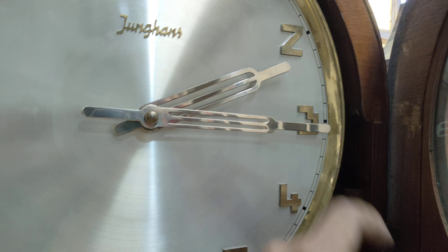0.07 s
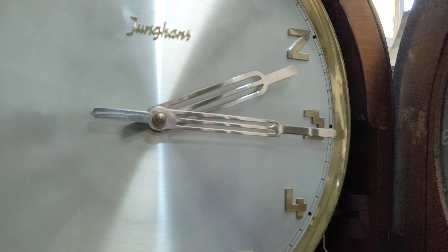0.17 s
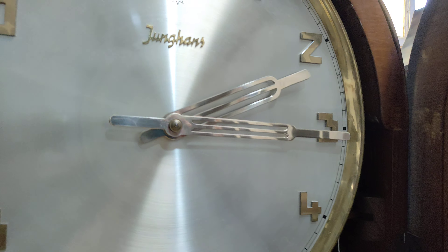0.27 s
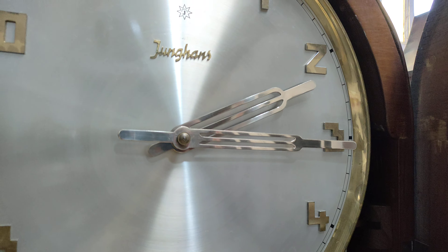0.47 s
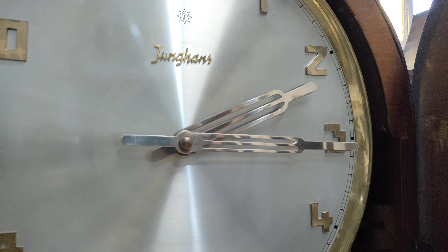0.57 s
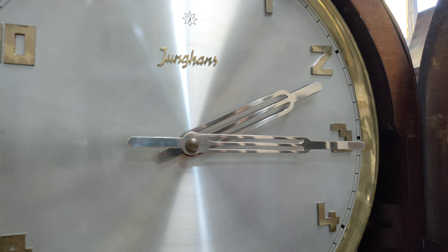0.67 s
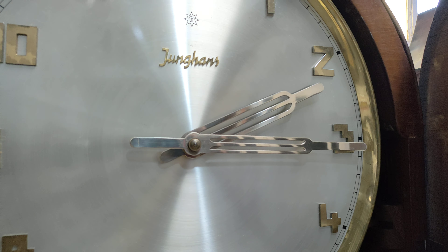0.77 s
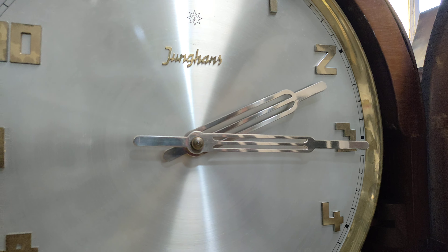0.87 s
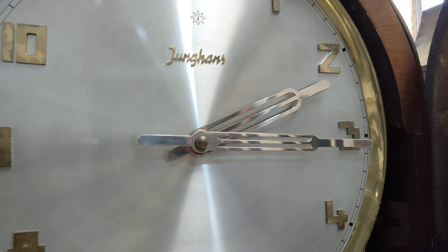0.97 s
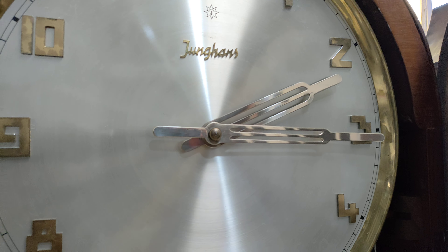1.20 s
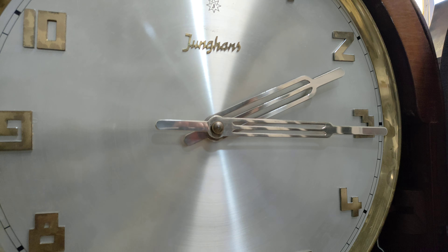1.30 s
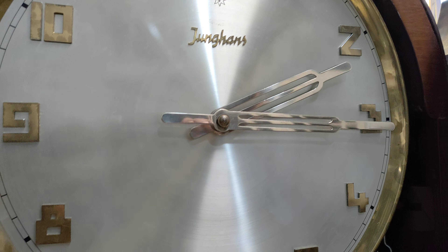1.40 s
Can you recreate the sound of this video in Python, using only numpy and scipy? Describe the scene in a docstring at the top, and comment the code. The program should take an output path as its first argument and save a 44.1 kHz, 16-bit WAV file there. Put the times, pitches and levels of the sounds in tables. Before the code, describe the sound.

A ringing metallic clink from a wall clock mechanism, after a light rattle.

```python
"""Wall clock in a hard room

The mechanism clinks after its minute hand has been pushed round, heard on a stereo pair of microphones.
Metal parts chatter lightly, then drop with a louder clink whose overtones ring out in the room.
The wooden case bumps softly and the levers tick; a low hum and a faint hiss lie underneath."""
import sys
import numpy as np
from scipy import signal
from scipy.fft import rfft, irfft
from scipy.io import wavfile

SR = 44100
rng = np.random.default_rng(int(sys.argv[2]) if len(sys.argv) > 2 else 0)


def transcribe(signal):
    """Save signal, clipped to [-1, 1], as a 16-bit WAV file at the path in sys.argv[1]."""
    frames = np.atleast_2d(signal).T
    limited = np.clip(frames, -1, 1)
    pcm = np.round(limited * 32767).astype(np.int16)
    wavfile.write(sys.argv[1], SR, pcm)


N = 63945

# Metal contacts in the works: start_s, ring_db, overtone_db, bright_clatter_db, dull_clatter_db
CONTACTS = [(0.1765, -49, -52, -40.5, -73), (0.185, -45, -39, -32.5, -38.5),
            (.1988, -37, -40.5, -30.5, -42.5), (0.226, -34.5, -47, -48, -45),
            (0.2851, -54, -37, -31, -35.5), (0.3, -35.5, -42, -27.5, -61), (.335, -49, -41, -42, -56),
            (0.363, -56, -40.5, -31.5, -52), (0.3825, -58, -36, -29, -41.5), (0.414, -56, -36, -31.5, -60),
            (0.4415, -31, -25.5, -35, -56), (0.4485, -22, -25.5, -32.5, -35),
            (0.471, -47, -28.5, -30.5, -33.5), (0.486, -36, -34, -27.5, -36), (.516, -29.5, -56, -40, -39),
            (0.657, -36.5, -50, -61, -59)]


def amp(db):
    """Decibels to gain."""
    return 10 ** (np.asarray(db) / 20)


def unit_rms(x):
    """Scales each channel to rms 1."""
    return x / np.sqrt(np.mean(abs(x) ** 2, axis=-1, keepdims=True) + 1e-20)


def seconds():
    """Time of each sample."""
    return np.arange(N) / SR


def curve_at(points, hz):
    """Reads a curve on a log-frequency axis."""
    point_hz, value = np.transpose(points)
    return np.interp(np.log(hz + 1), np.log(point_hz), value)


def fader(points):
    """A curve of decibels over time as a gain for each sample."""
    return amp(np.interp(seconds(), *np.transpose(points)))


def noise(colour, grain_db=0, peaks=(), ripple_db=0, peak_width_hz=41.4, ripple_step_hz=18):
    """Coloured stereo noise at rms 1; grain makes it a spray of tiny clicks, ripple a crowd of modes."""
    # Likeness of the two microphones, greatest in the bass: frequency_hz, correlation
    likeness = [(30, 0.43), (250, 0.93), (450, 0.53), (900, 0.014), (2500, -0.092), (5000, -0.044),
                (16000, .1)]
    hz = np.fft.rfftfreq(N, 1 / SR)
    grains = np.repeat(np.minimum(rng.exponential(size=N), 4), 16)[:N]  # 16 samples each
    left, unrelated = rfft(rng.standard_normal((2, N)) * amp(grain_db * grains))
    correlation = curve_at(likeness, hz)
    right = correlation * left + np.sqrt(1 - correlation ** 2) * unrelated
    peaks_db = sum(boost / (1 + ((hz - centre) / peak_width_hz) ** 2) for centre, boost in peaks)
    ripple = np.interp(hz / ripple_step_hz, np.arange(N), rng.uniform(-0.63, 1, N))
    spectrum_db = curve_at(colour, hz) + peaks_db + ripple_db * ripple
    return unit_rms(irfft(np.array([left, right]) * amp(spectrum_db), N))


def blows(start_s, level_db, rise_s, t60_s):
    """Envelope of a run of blows: each one's energy builds up, dies away and adds to the rest."""
    age = np.maximum(seconds() - start_s[:, None], 0)
    energy = (1 - np.exp(-age / rise_s)) * np.exp(-2 * np.log(1000) * age / t60_s)
    return np.sqrt(amp(level_db) ** 2 @ energy)


def mode(hz, room_share, width_hz):
    """One mode at two microphones: a pure tone plus reflections that beat against it."""
    offset_hz = np.fft.fftfreq(N, 1 / SR)
    phases = np.exp(2j * np.pi * rng.random((2, N)))
    echoes = unit_rms(np.fft.ifft(phases / (1 + (offset_hz / width_hz) ** 2)))
    direct = np.exp(1j * (2 * np.pi * rng.random() + np.array([[0], [np.pi / 3]])))
    beating = np.sqrt(1 - room_share) * direct + np.sqrt(room_share) * echoes
    return np.sqrt(2) * (beating * np.exp(2j * np.pi * hz * seconds())).real


def room_tone():
    """Steady room noise, a hiss that swells a little and a low wavering hum."""
    # Spectra of the steady noise and the hiss: frequency_hz, relative_db
    floor_colour = [(25, -9.5), (55, -5.5), (80, -9.5), (125, -2.5), (230, -6.5), (340, -4), (450, -16),
                    (800, -14.5), (1200, -13.5), (2000, -12), (2900, -25.5), (4600, -15.5), (6000, -25),
                    (8200, -41), (15500, -62)]
    hiss_colour = [(300, -33), (800, -20.5), (1300, -4), (2000, -4), (2900, -1), (4600, -2), (6000, -7),
                   (8400, -22), (14000, -29.5), (15500, -34)]
    # Faint resonances in both: pitch_hz, boost_db
    air_peaks = [(530, 9), (815, 8), (1950, 8.5), (2220, 8), (4590, 6), (4715, 10)]
    # Rise and fall of the hiss and the hum: time_s, level_db
    hiss_levels = [(0, -57), (.95, -56), (1.09, -57), (1.2, -50.5), (1.45, -52)]
    hum_levels = [(0, -59), (0.07, -53), (0.13, -69), (0.93, -73), (1.01, -62), (1.2, -55.5),
                  (1.45, -58.5)]
    hum = mode(hz=57, room_share=0.15, width_hz=8)[0] * fader(hum_levels)
    floor = amp(-54) * noise(floor_colour, peaks=air_peaks)
    hiss = noise(hiss_colour, grain_db=1.0, peaks=air_peaks) * fader(hiss_levels)
    return floor + hiss + hum


def lever_ticks():
    """Small dry ticks as the levers settle."""
    # Ticks: start_s, level_db
    ticks = [(0.4415, -35), (.663, -47), (0.823, -46), (1.126, -55.5)]
    # Spectrum of a tick: frequency_hz, relative_db
    tick_colour = [(200, -6), (550, -11), (790, 2.5), (1100, -8), (1900, -1), (3000, -8.5), (5000, -9),
                   (8000, -46)]
    return noise(tick_colour, grain_db=0.5) * blows(*np.transpose(ticks), rise_s=0.00099, t60_s=0.27)


def case_bumps():
    """The wooden case answers each bump with one boom and a dull, hollow knock."""
    # Soft bumps: start_s, boom_db, knock_db
    bumps = [(0.131, -48, -50), (0.183, -42, -41.5), (0.237, -38, -48), (.365, -64, -45.5),
             (.40, -41.5, -53), (.443, -70, -46.5), (0.549, -48, -46), (.585, -44, -45.5),
             (0.628, -69, -44.5), (.715, -58, -47.5), (0.821, -49.5, -45.5), (0.913, -51.5, -50),
             (1.17, -54, -89), (1.26, -47.5, -59)]
    # Hollow tones of the case: pitch_hz, relative_db
    case_modes = [(238, -6.5), (315, -10), (379, -5)]
    # Spectrum of the knocked wood: frequency_hz, relative_db
    wood_colour = [(100, -18), (165, 2.5), (240, -8), (380, -4), (470, -10), (800, -7.5), (2000, -18.5),
                   (6000, -59)]
    start_s, boom_db, knock_db = np.transpose(bumps)
    boom = mode(hz=120.3, room_share=0.187, width_hz=6.5)[0]
    boom *= blows(start_s, boom_db, rise_s=0.021, t60_s=0.28)
    hollow = sum(amp(db) * mode(hz, room_share=0.49, width_hz=11.7)[0] for hz, db in case_modes)
    knock = hollow + amp(-6) * noise(wood_colour)
    return boom + knock * blows(start_s, knock_db, rise_s=0.015, t60_s=0.35)


def clatter(room_db=-4):
    """Each contact is a burst of tiny impacts in the crowded modes of the works, then the room's tail."""
    # Spectra of the bright and the dull clatter: frequency_hz, relative_db
    bright_colour = [(300, -40), (1200, -16.5), (2100, -10.5), (2900, -7.5), (3400, -6.5), (3700, -4),
                     (3950, 2.5), (4600, 3.5), (5200, -8.5), (5950, -3), (6300, -20.5), (6900, -30.5),
                     (8000, -44), (16000, -64)]
    dull_colour = [(200, -10), (520, -13.5), (800, -12), (1150, -1.5), (1500, -2), (1800, -5), (2250, 5),
                   (2700, -19), (4000, -0.5), (7000, -44), (12000, -75)]
    # Short-lived resonances of the wheels and levers: pitch_hz, boost_db
    works_peaks = [(745, 2.5), (1030, 2.5), (1165, 0), (1440, 10), (1793, 3.5), (2080, 9), (2480, 9),
                   (2690, -3.5), (2835, 8), (3110, 9.5), (3170, 10.5), (3330, 2.5), (3580, 7), (3945, 3.5),
                   (4170, -2), (4430, 0), (4610, 2.5), (5210, 2), (5490, -2.5), (5870, 16), (6480, 27),
                   (6620, 23)]
    start_s, _, _, bright_db, dull_db = np.transpose(CONTACTS)
    out = np.zeros((2, N))
    for colour, level_db in ((bright_colour, bright_db), (dull_colour, dull_db)):
        impacts = noise(colour, grain_db=1.5, peaks=works_peaks)
        out += impacts * blows(start_s, level_db, rise_s=0.0026, t60_s=0.068)
        tail = noise(colour, peaks=works_peaks, ripple_db=8.5)
        out += tail * blows(start_s, level_db + room_db, rise_s=0.0039, t60_s=0.58)
    return out


def overtones():
    """Every contact feeds the same metal overtones, which swell in the room and ring out."""
    # Overtones of the metal, one list per column: pitch_hz, relative_db, t60_s
    pitch_hz = [1542, 1572, 2130, 2229, 3097, 3137, 4308, 4746, 5478, 5884, 5945, 6462, 6639, 7306]
    relative_db = [-16.5, -12, -17, -13.5, -25.5, -17.5, -10, -13, -16.5, -7.5, -12, -13, -35, -10]
    t60_s = [0.65, 0.48, 0.63, 0.69, 0.47, 0.51, 0.29, 0.46, 0.42, 0.47, 0.8, 0.29, 0.17, 0.63]
    # Faint top overtones, which die alike: pitch_hz, relative_db
    shimmer_modes = [(7570, -25), (8777, -25.5), (8945, -17.5), (9423, -22), (9843, -31), (10777, -24),
                     (10850, -28.5), (11475, -19), (12036, -28), (12383, -25), (14077, -26), (14517, -34),
                     (14636, -24.5), (15139, -36)]
    start_s, _, overtone_db, _, _ = np.transpose(CONTACTS)
    ringing = np.zeros((2, N))
    for hz, db, t60 in zip(pitch_hz, relative_db, t60_s):
        envelope = blows(start_s, overtone_db + db, rise_s=0.019, t60_s=t60)
        ringing += envelope * mode(hz, room_share=0.64, width_hz=27)
    shimmer = sum(amp(db) * mode(hz, room_share=0.5, width_hz=33) for hz, db in shimmer_modes)
    return ringing + shimmer * blows(start_s, overtone_db, rise_s=0.036, t60_s=0.47)


def main_ring(damped_at_s=0.687, damped_over_s=0.035, damped_db=-8.5):
    """The struck metal's main mode speaks at once and is checked as the works settle."""
    start_s, ring_db, _, _, _ = np.transpose(CONTACTS)
    envelope = blows(start_s, ring_db, rise_s=0.0024, t60_s=0.52)
    damping = amp(damped_db * np.clip((seconds() - damped_at_s) / damped_over_s, 0, 1))
    microphone_gains = amp([[-1.2], [2.2]])  # a little right of centre
    return microphone_gains * envelope * damping * mode(hz=4713, room_share=0.15, width_hz=34)


def scene():
    """The clock and its room at the two microphones."""
    return main_ring() + overtones() + clatter() + case_bumps() + lever_ticks() + room_tone()


def record(dry):
    """The recorder's band limit: a steep low-pass at 15.6 kHz."""
    low_pass = signal.firwin(511, 15600, window=("kaiser", 9), fs=SR)
    return signal.oaconvolve(dry, low_pass[None], "same")


dry = scene()
out = record(dry)
transcribe(out)
```